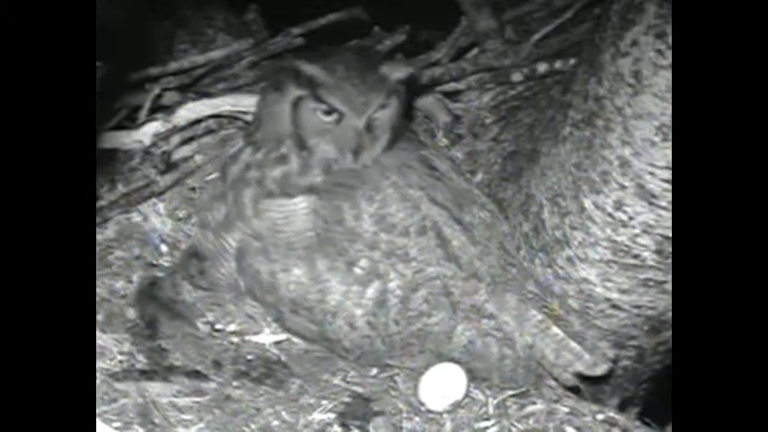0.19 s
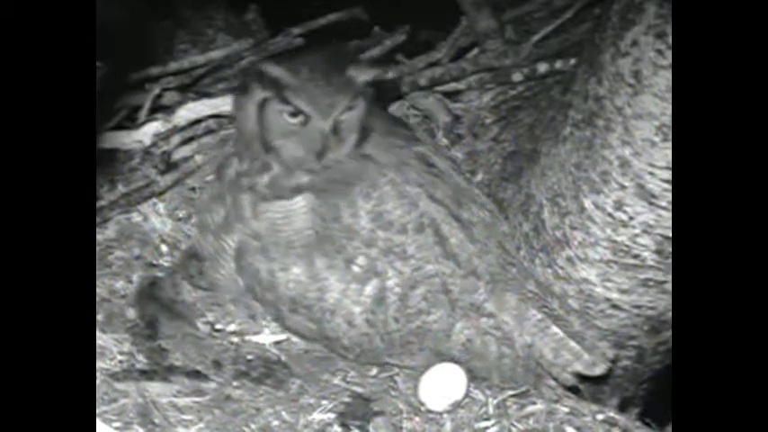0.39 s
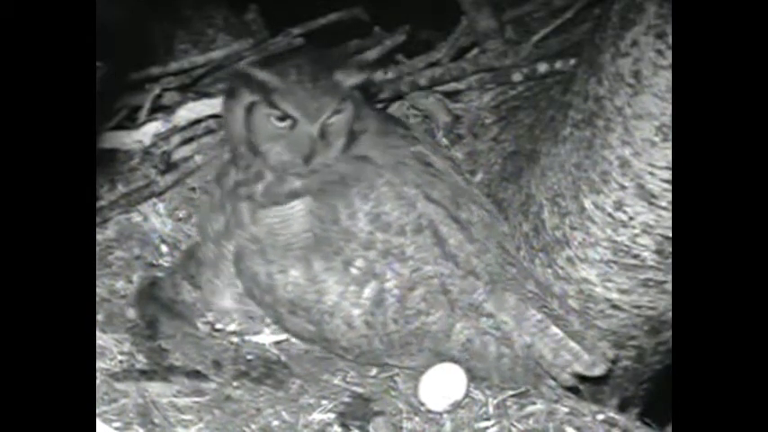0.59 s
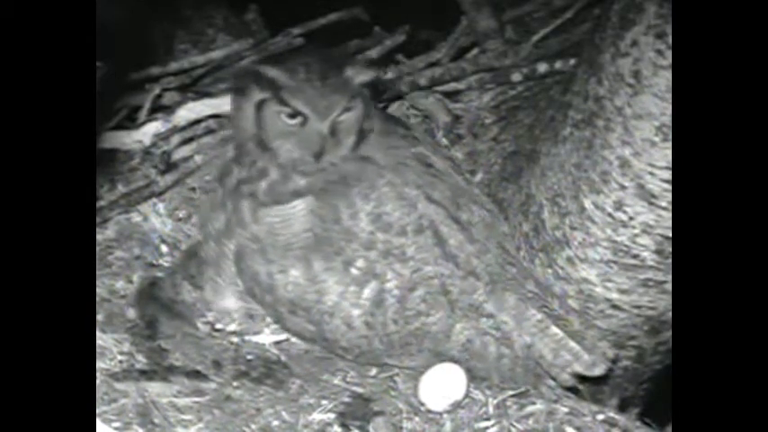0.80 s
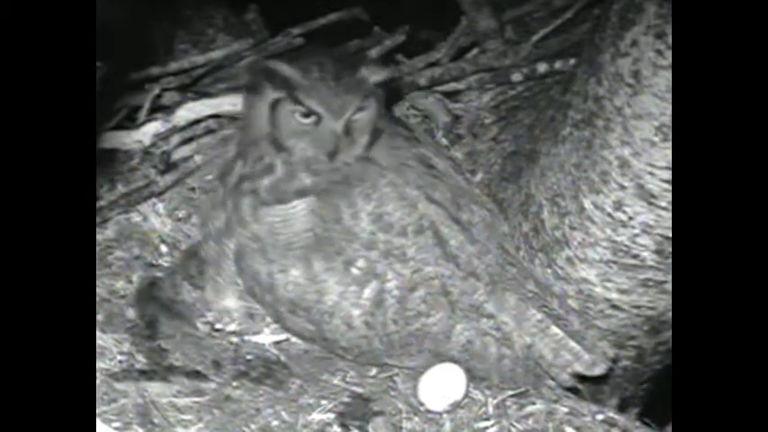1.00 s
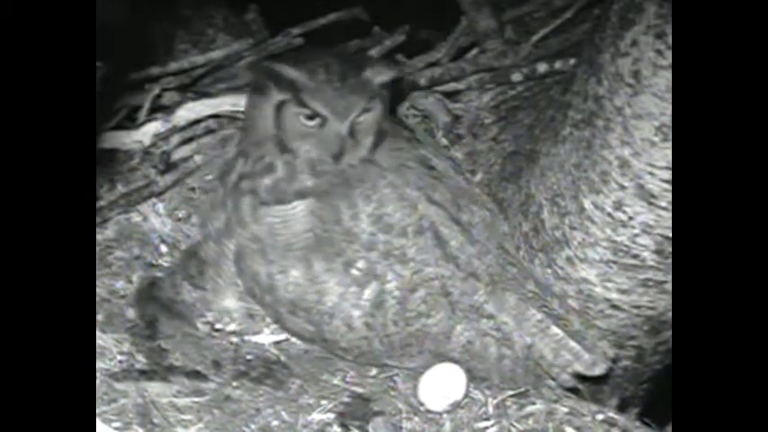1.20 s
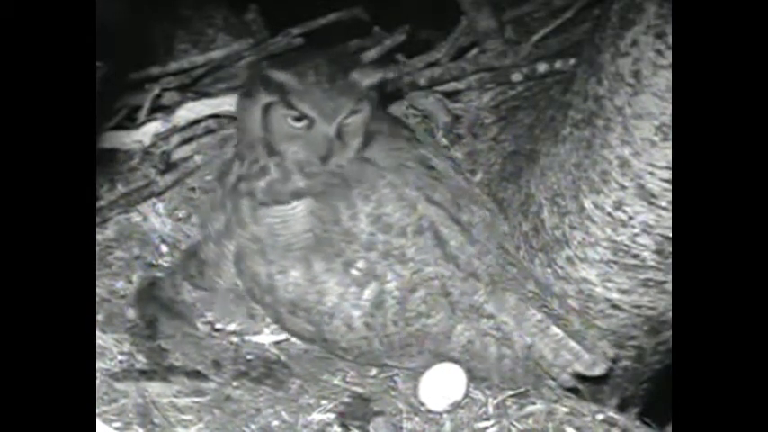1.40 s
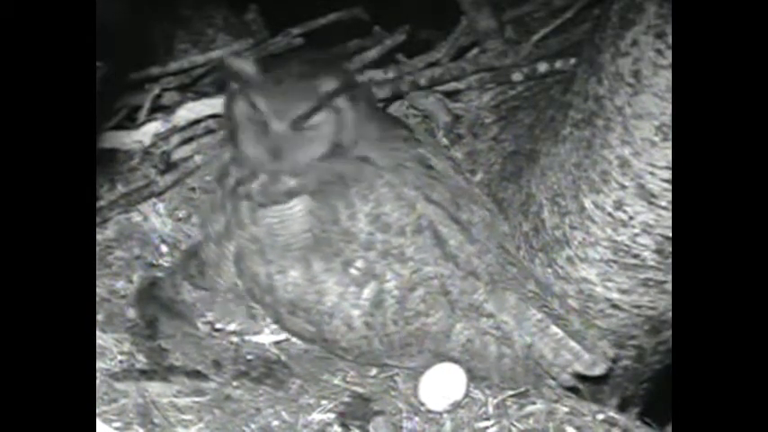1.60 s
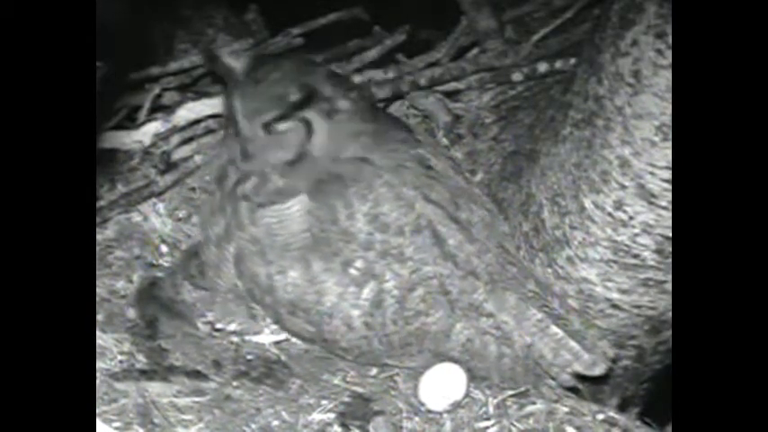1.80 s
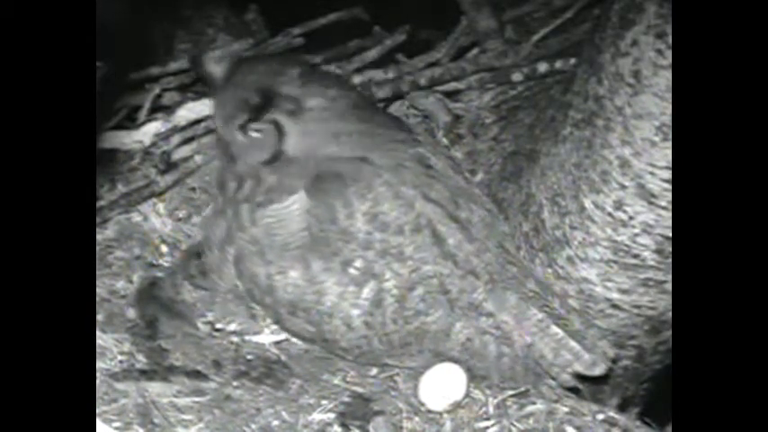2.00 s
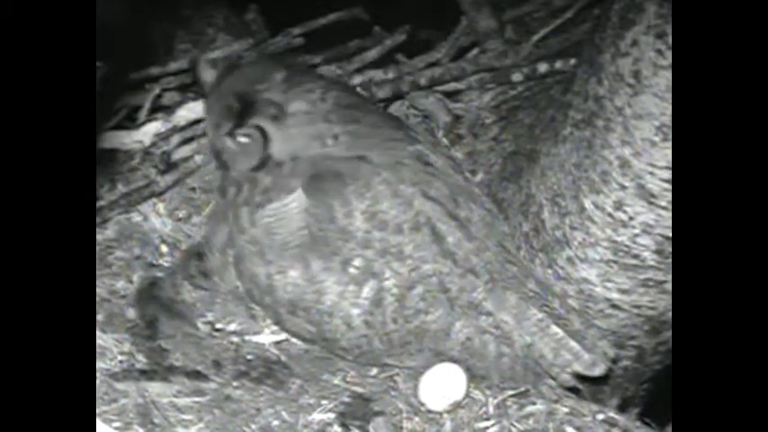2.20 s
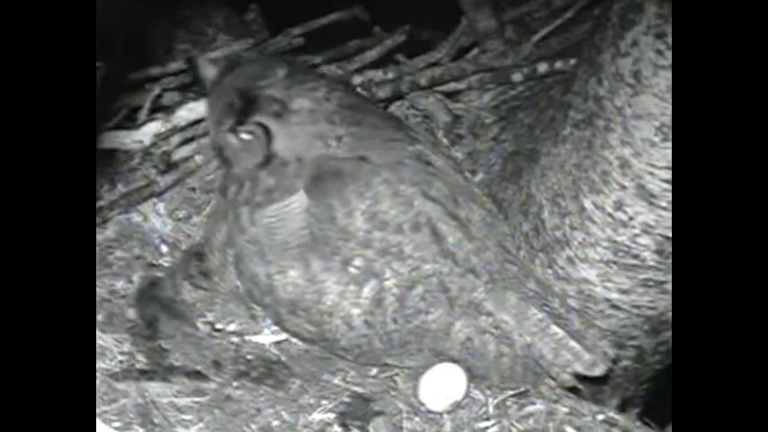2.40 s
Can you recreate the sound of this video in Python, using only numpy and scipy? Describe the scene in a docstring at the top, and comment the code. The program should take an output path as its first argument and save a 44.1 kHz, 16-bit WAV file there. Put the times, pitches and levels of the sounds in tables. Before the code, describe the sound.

A great horned owl gives one short low hoot early on, close to a small microphone at its nest; then only steady hollow hiss, faint chirpy ticks and a few soft dull knocks remain.

```python
"""A nest, heard close by through a small microphone: a great horned owl gives one short, low hoot. The hoot is
an almost pure gliding tone with a little breath around it. Dull knocks ring the nest's low modes, among faint
chirpy ticks, probably the sticks. Behind them lies a hollow, steady rush of shaped noise, soft low shuffles of
the owl's feathers here and there, and a hiss that buzzes faintly, its short spits repeating at the mains rate."""
import sys
import numpy as np
from scipy import signal
from scipy.fft import rfft, irfft
from scipy.io import wavfile
from scipy.ndimage import uniform_filter1d

SR = 44100
rng = np.random.default_rng(int(sys.argv[2]) if len(sys.argv) > 2 else 0)


def log_audio(samples):
    """Write samples as a 16-bit WAV file to the path given in sys.argv[1]."""
    # one column per channel
    frames = np.atleast_2d(samples).T
    # limit to full scale, then quantise
    limited = np.clip(frames, -1, 1)
    pcm = np.round(limited * 32767).astype(np.int16)
    wavfile.write(sys.argv[1], SR, pcm)


N = 105840  # 2.4 s

# Colour of the steady rush. Each row: frequency in Hz, relative density in dB.
RUSH_SPECTRUM = [(25, -49), (55, -47), (90, -38.5), (130, -30.5), (200, -14.5), (260, -11.5), (350, 2),
                 (520, 3.5), (650, -1.5), (800, -7.5), (1150, -13.5), (1850, -14), (2030, -15),
                 (2300, -15.5), (2600, -17.5), (3000, -18), (4200, -22.8), (7000, -23.5), (8300, -27.5),
                 (9300, -33), (10000, -39.5)]

# Spits of hiss within every mains cycle. Each row: place in the cycle from 0 to 1, width in cycles,
# centre in Hz, bandwidth in Hz, glide in Hz per cycle, level in dB.
MAINS_SPITS = [(0.078, 0.0076, 2930, 4500, 8, -56.5), (0.129, 0.033, 7320, 2170, 4.5, -63.5),
               (.45, 0.041, 4210, 784, -17000, -71.5), (.58, 0.026, 7600, 1785, 5, -66.5)]

# Soft low shuffles of the owl's feathers. Each row: middle in seconds, length (standard deviation) in seconds,
# # level in dB, centre in Hz.
FEATHER_SHUFFLES = [(0.62, 0.011, -59.5, 205), (0.771, 0.046, -70.5, 177), (0.901, 0.03, -53, 395),
                    (1.202, 0.081, -55.5, 364), (1.226, .06, -74, 170), (1.418, 0.031, -62, 200),
                    (1.514, 0.0087, -62.5, 192), (1.626, 0.051, -71, 158)]

# The clearer ticks. Each row: start in seconds, level in dB, pitch in Hz, rise length in seconds.
CLEAR_TICKS = [(0.043, -51.5, 2380, 0.0091), (.162, -63, 2230, .008), (.343, -51, 2352, 0.0076),
               (0.412, -53, 2314, 0.0047), (0.429, -56, 2220, .008), (0.445, -54, 2216, 0.024),
               (0.465, -57, 2298, 0.01), (0.489, -56, 2270, 0.0033), (.565, -57.5, 2350, 0.015),
               (0.594, -52, 2367, .018), (0.801, -55, 2290, 0.0061), (0.849, -64, 2290, .008),
               (0.866, -56.5, 2330, .009), (0.907, -59, 2340, 0.0073), (1.042, -58, 2348, 0.013),
               (1.421, -57.5, 2290, .008), (1.452, -53.5, 2210, 0.01), (1.494, -56, 2320, .008),
               (1.511, -56, 2170, .008), (1.607, -49.5, 2430, 0.0033), (1.795, -57, 2195, 0.011),
               (1.885, -57, 2280, 0.011), (1.97, -53, 2330, 0.0084), (2.03, -52.5, 2321, 0.011),
               (2.079, -58, 2310, 0.017), (2.117, -59.5, 2285, .015)]

# Dull knocks. Each row: start in seconds, level in dB, brightness in dB per octave.
DULL_KNOCKS = [(.510, -36, 2.5), (0.622, -40.5, -2.5), (0.968, -49.5, 9), (1.17, -47.5, -13),
               (1.340, -41.5, -3), (1.487, -41.5, -8), (1.767, -37, 0.5), (1.793, -47, -11),
               (1.969, -52, 21), (2.129, -35.5, -2.5)]

# What the nest rings with. Each row: frequency in Hz, relative level in dB, 60 dB decay in seconds,
# rise in seconds.
NEST_RINGS = [(299, -7, 0.097, 0.0034), (355, 3, .11, 0.0063), (439, -4.5, .06, 0.0036),
              (474.7, -5.5, 0.11, 0.0043), (541, -1.5, 0.095, 0.0045), (639, -14, 0.049, 0.0028)]

# Pitch of the hoot. Each row: time in seconds, pitch in Hz.
PITCH_PATH = [(.205, 428), (.255, 433.6), (.28, 404.4), (.318, 377.4), (.35, 414.4), (.386, 406.4),
              (.40, 426), (.455, 422.6), (.478, 446), (.51, 480)]

# The owl's effort. Each row: time in seconds, level in dB.
EFFORT_PATH = [(.208, -42.5), (.224, -43), (.241, -59), (.250, -41), (.271, -41.5), (.281, -35),
               (.312, -35.5), (.335, -31.5), (.41, -30.5), (.473, -33), (.481, -52.5), (.488, -37),
               (.51, -46)]

# Overtones of the hoot. Each row: multiple of the pitch, level in dB relative to the fundamental.
HOOT_OVERTONES = [(2, -43.5), (3, -41)]

RUSH_DB, RUSH_PATCH_DB = -49.5, 2  # patch depth is for the lowest frequencies
MAINS_HZ = 59.985
SWELL_WIDTH_SHARE, SWELL_LOW_CUT_HZ = 0.61, 107  # bandwidth as a share of the centre

TICK_T60_S, TICK_WIDTH_HZ, TICK_NOISE_DB = 0.043, 240, -5.5
TICK_WANDER_HZ, TICK_WANDER_RATE_HZ = 80, 360
SMALL_TICKS_PER_S, SMALL_TICK_DB, SMALL_TICK_SPREAD_DB = 50, -64.5, 3
SMALL_TICK_HZ, SMALL_TICK_RISE_S = 2299, 0.011

KNOCK_HOLD_S, KNOCK_PIVOT_HZ = 0.0081, 397  # brightness tilts the modes about the pivot
KNOCK_DETUNE, KNOCK_LOW_CUT_HZ = 0.0041, 255
CRUNCH_DB, CRUNCH_RISE_S, CRUNCH_T60_S = -13, 0.004, 0.2
CRUNCH_HZ, CRUNCH_WIDTH_HZ = 420, 190

HOOT_EDGE_S, HOOT_LOW_CUT_HZ = 0.015, 155
JITTER, SHIMMER_DB, FLUTTER_HZ = 0.0064, -0.05, 68  # jitter as a share of the pitch
ONSET_JITTER, ONSET_SETTLE_S = 0.024, 0.037  # unsteady until the voice takes hold
AIR_HZ, AIR_WIDTH_HZ, AIR_DB = 616, 86, -26  # breathy edge, relative to the tone
HALO_HZ, HALO_WIDTH_HZ, HALO_DB = 713, 270, -10  # its upper skirt, relative to the edge
RASP_S, RASP_LENGTH_S, RASP_DB = 0.37, 0.039, 10.5  # the edge hoarsens near full strength

RECORDER_EDGE_HZ = 9930


def amp(db):
    """Decibels to gain."""
    return 10 ** (np.asarray(db) / 20)


def unit(x):
    """Scales to an rms of 1."""
    return x / np.sqrt(np.mean(x ** 2) + 1e-20)


def add(mix, start_s, sound):
    """Mixes a sound in at a time, cut off where the mix ends."""
    part = mix[max(round(start_s * SR), 0):][:len(sound)]
    part += sound[:len(part)]


def band(centre_hz, width_hz, size):
    """Noise in one rounded band, at an rms of 1."""
    f = np.fft.rfftfreq(size, 1 / SR)
    response = 1 / (1 + ((f - centre_hz) / (width_hz / 2)) ** 4) ** 0.5
    return unit(irfft(rfft(rng.standard_normal(size)) * response, size))


def low_cut(x, hz):
    """Takes out the rumble below a frequency."""
    return signal.sosfilt(signal.butter(3, hz, "high", fs=SR, output="sos"), x)


def rush():
    """Steady hollow noise, shaped frame by frame in frequency, with slight drifting patches."""
    hz = np.fft.rfftfreq(1024, 1 / SR)
    real, imag, patches = rng.standard_normal((3, N // 256 + 5, len(hz)))
    patches = uniform_filter1d(patches, size=10, axis=0)  # smooth over time
    patches = unit(uniform_filter1d(patches, size=12, axis=1))  # and over frequency
    f, density_db = np.transpose(RUSH_SPECTRUM)
    colour_db = np.interp(np.log(hz + 1), np.log(f), density_db)
    patch_db = RUSH_PATCH_DB * patches / (1 + hz / 3000)  # weaker in the treble
    frames = (real + 1j * imag) * amp(colour_db + patch_db)
    noise = signal.istft(frames.T, nperseg=1024, noverlap=768)[1][:N]
    return amp(RUSH_DB) * unit(noise)


def feather_shuffles():
    """Faint low shuffles of the owl's feathers, each one band of noise under a bell-shaped envelope."""
    out, t = np.zeros(N), np.arange(N) / SR
    for middle, length, db, hz in FEATHER_SHUFFLES:
        swell = np.exp(-0.5 * ((t - middle) / length) ** 2)
        out += amp(db) * swell * band(hz, SWELL_WIDTH_SHARE * hz, N)
    return low_cut(out, SWELL_LOW_CUT_HZ)


def buzz():
    """Electrical interference: short spits of hiss repeat with the mains."""
    out, cycles = np.zeros(N), np.arange(N) / SR * MAINS_HZ
    for place, width, hz, width_hz, glide, db in MAINS_SPITS:
        offset = (cycles - place + 0.5) % 1 - 0.5  # cycles from the spit's middle
        envelope = np.exp(-0.5 * (offset / width) ** 2)
        turn = np.exp(2j * np.pi * np.cumsum(glide * offset) / SR)  # shifts the hiss in frequency
        hiss = (signal.hilbert(band(hz, width_hz, N)) * turn).real
        out += amp(db) * envelope * hiss
    return out


def small_ticks():
    """Rows like the clear ticks, scattered at random in time, level and pitch."""
    rows = []
    for u, v, w in rng.random((round(SMALL_TICKS_PER_S * N / SR), 3)):
        db = SMALL_TICK_DB + SMALL_TICK_SPREAD_DB * (2 * v - 1)
        hz = SMALL_TICK_HZ + TICK_WIDTH_HZ * (w - 0.5)
        rows.append((u * N / SR, db, hz, SMALL_TICK_RISE_S))
    return rows


def ticks():
    """Brief chirpy scratches: each a narrow ring of wandering pitch, roughened by noise."""
    out, t = np.zeros(N), np.arange(SR // 10) / SR
    for start, db, hz, length in list(CLEAR_TICKS) + small_ticks():
        pitch = hz + TICK_WANDER_HZ * band(0, TICK_WANDER_RATE_HZ, len(t))
        tone = np.sin(2 * np.pi * np.cumsum(pitch) / SR)
        ring = unit(tone + amp(TICK_NOISE_DB) * band(hz, TICK_WIDTH_HZ, len(t)))
        rise = np.minimum(t / length, 1)
        decay_db = -60 * np.maximum(t - length, 0) / TICK_T60_S
        add(out, start, rise * amp(db + decay_db) * ring)
    return out


def knocks():
    """Soft blows ring the nest's low modes, which build up and die away, along with a dull crunch."""
    out, t = np.zeros(N), np.arange(SR // 4) / SR
    released = np.maximum(t - KNOCK_HOLD_S, 0)  # the modes decay only after the hold
    for start, db, brightness in DULL_KNOCKS:
        ring = np.zeros(len(t))
        for hz, mode_db, t60, rise in NEST_RINGS:
            tilt_db = brightness * np.log2(hz / KNOCK_PIVOT_HZ)
            level = np.minimum(t / rise, 1) * amp(mode_db + tilt_db - 60 * released / t60)
            detuned_hz = hz * (1 + KNOCK_DETUNE * rng.normal())
            ring += level * np.sin(2 * np.pi * detuned_hz * t)
        crunch_level = np.minimum(t / CRUNCH_RISE_S, 1) * amp(CRUNCH_DB - 60 * t / CRUNCH_T60_S)
        crunch = crunch_level * band(CRUNCH_HZ, CRUNCH_WIDTH_HZ, len(t))
        add(out, start, amp(db) * (ring + crunch))
    return low_cut(out, KNOCK_LOW_CUT_HZ)


def hoot():
    """A near sine that swells, dips in pitch and lifts as it stops, with a little air around it."""
    t = np.arange(N) / SR
    start, end = EFFORT_PATH[0][0], EFFORT_PATH[-1][0]
    jitter = JITTER + ONSET_JITTER * np.exp(-np.maximum(t - start, 0) / ONSET_SETTLE_S)
    flutter = 1 + jitter * band(0, 2 * FLUTTER_HZ, N)
    pitch = np.interp(t, *np.transpose(PITCH_PATH)) * flutter

    gate = np.clip(np.minimum(t - start, end - t) / HOOT_EDGE_S + 0.5, 0, 1)
    shimmer_db = SHIMMER_DB * band(0, 2 * FLUTTER_HZ, N)
    level = gate * amp(np.interp(t, *np.transpose(EFFORT_PATH)) + shimmer_db)

    phase = 2 * np.pi * np.cumsum(pitch) / SR
    tone = np.sin(phase)
    for multiple, db in HOOT_OVERTONES:
        tone += amp(db) * np.sin(round(multiple) * phase)

    air_db = AIR_DB + RASP_DB * np.exp(-0.5 * ((t - RASP_S) / RASP_LENGTH_S) ** 2)
    air = band(AIR_HZ, AIR_WIDTH_HZ, N) + amp(HALO_DB) * band(HALO_HZ, HALO_WIDTH_HZ, N)
    return low_cut(level * (unit(tone) + amp(air_db) * air), HOOT_LOW_CUT_HZ)


def scene():
    """Microphone noise, nest and owl in one channel."""
    return (rush() + feather_shuffles() + buzz() + ticks() + knocks() + hoot())[None]


def record(dry):
    """The recorder's band limit: a steep low-pass."""
    low_pass = signal.firwin(511, RECORDER_EDGE_HZ, window=("kaiser", 8), fs=SR)
    return signal.oaconvolve(dry, low_pass[None], "same")


dry = scene()
out = record(dry)
log_audio(out)
```